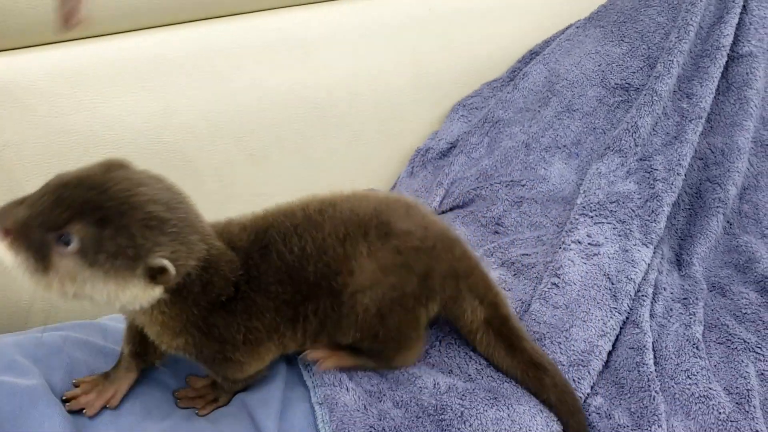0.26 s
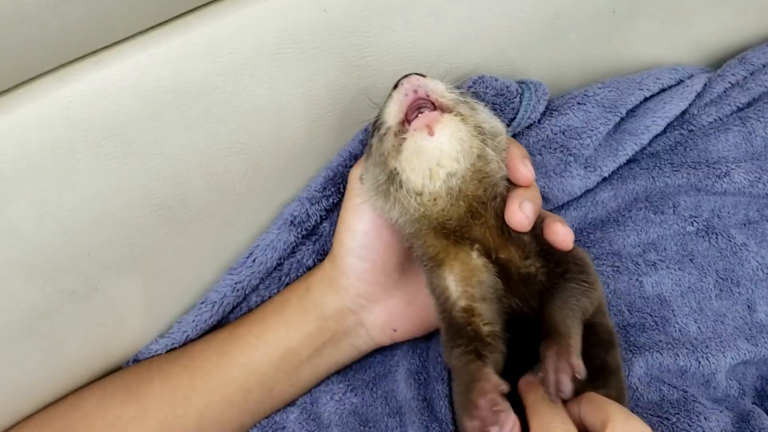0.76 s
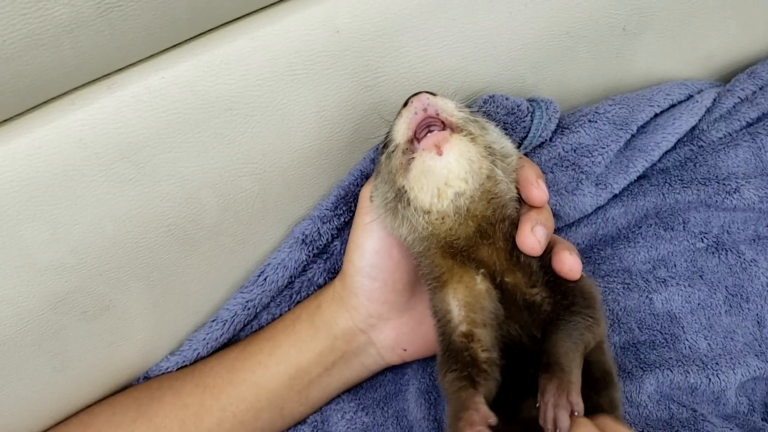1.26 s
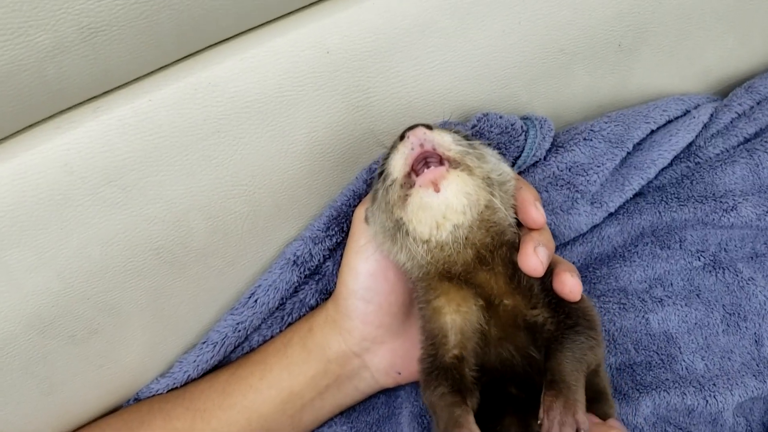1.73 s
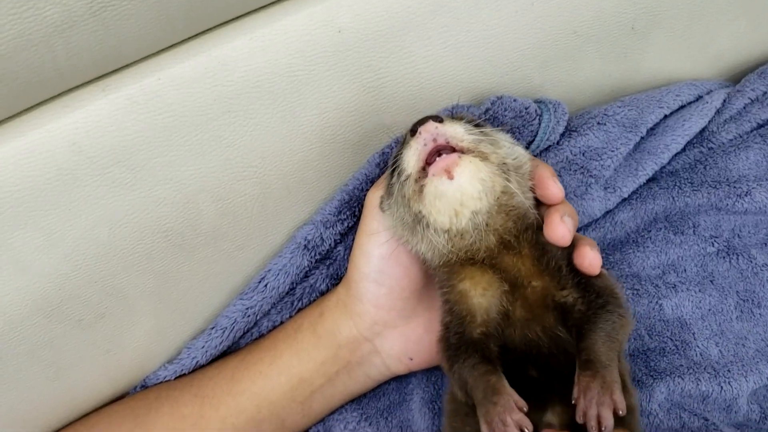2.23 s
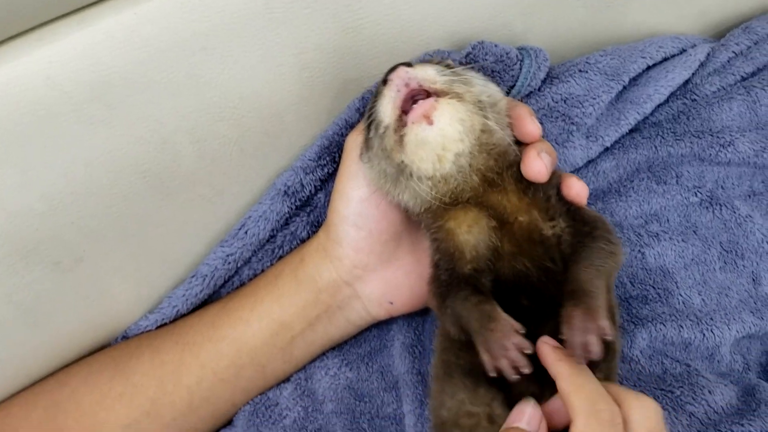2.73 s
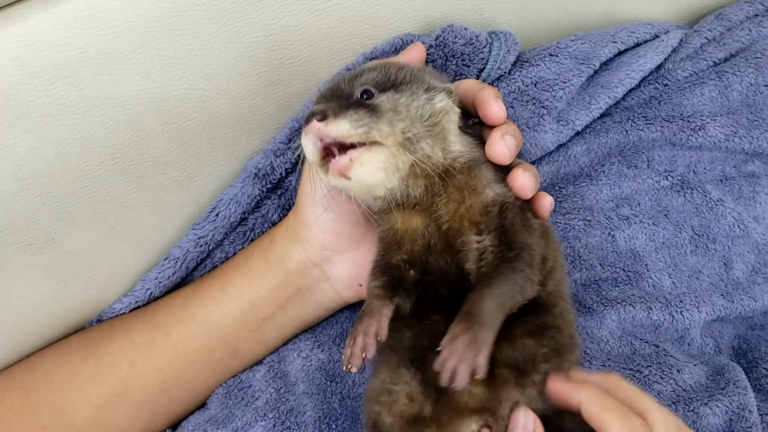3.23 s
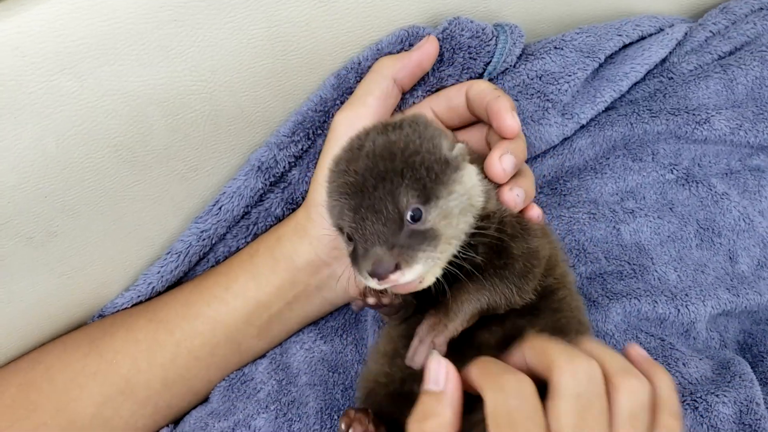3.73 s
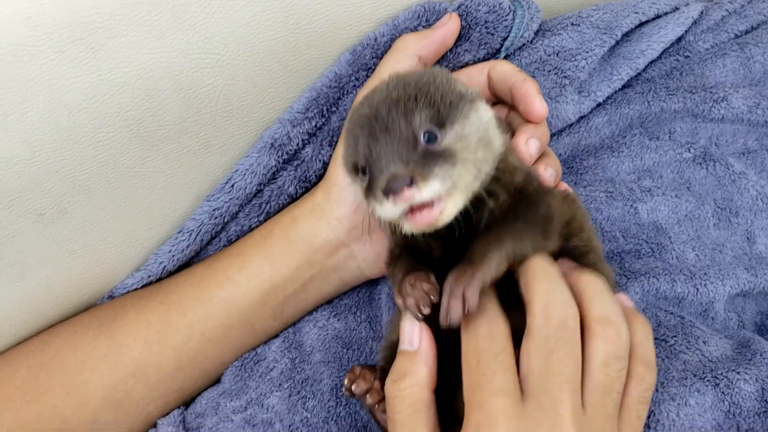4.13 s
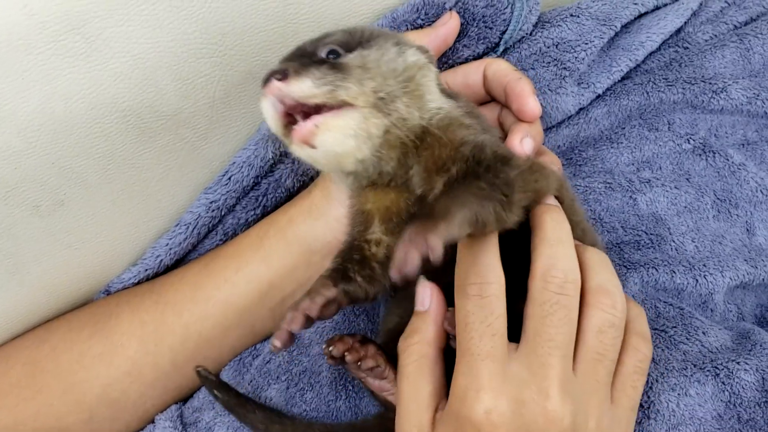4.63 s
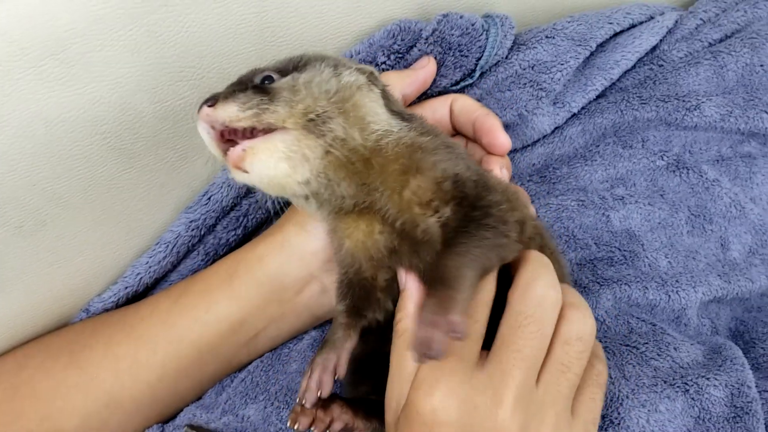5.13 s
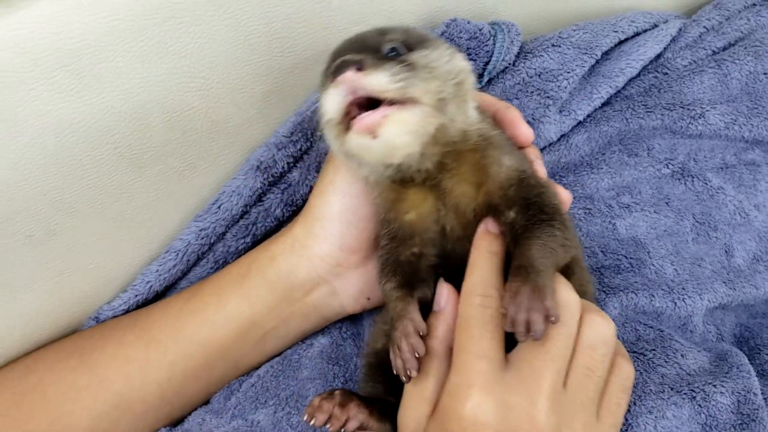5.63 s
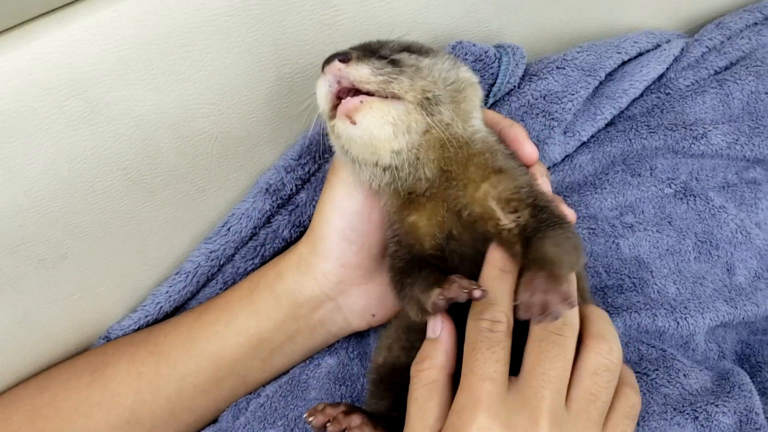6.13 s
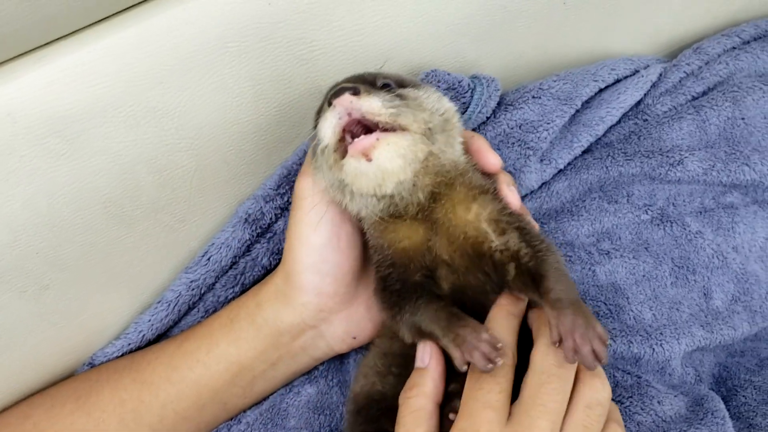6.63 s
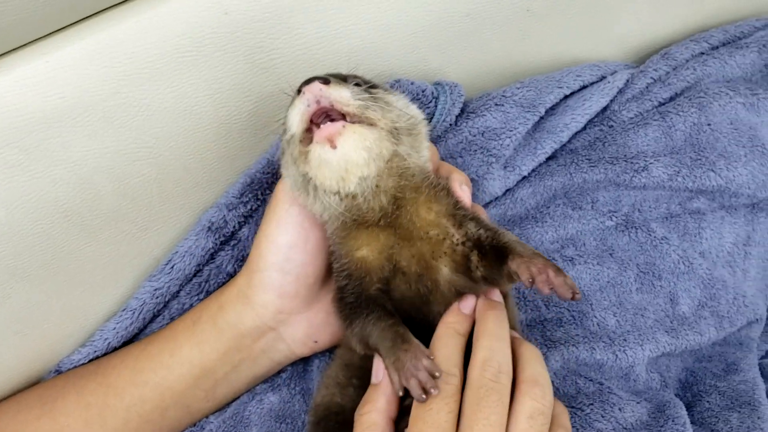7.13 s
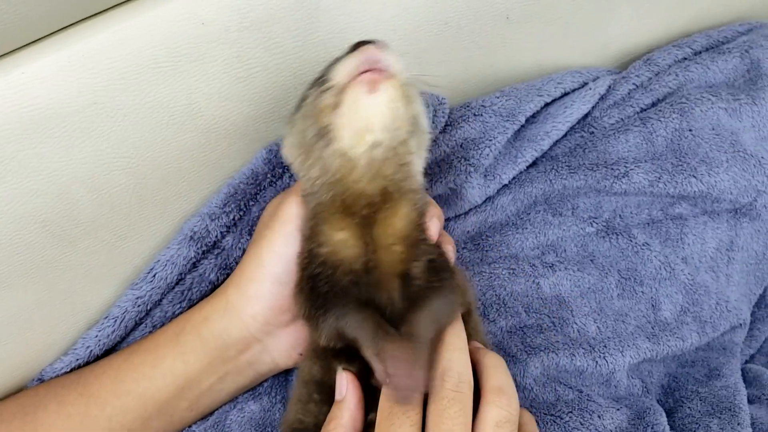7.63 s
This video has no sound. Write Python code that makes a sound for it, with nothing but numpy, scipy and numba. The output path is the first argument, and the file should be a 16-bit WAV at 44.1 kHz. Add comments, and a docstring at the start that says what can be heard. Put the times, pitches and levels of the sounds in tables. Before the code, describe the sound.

An otter pup, held close to paired microphones in a hard-walled room, cries over and over. After half a second of quiet air, a dull nudge and a tiny dropout, the squeals start abruptly, bright and grating. The middle ones are longer and a little more muffled, the later ones louder and sharper, with cracks into clear whistly pitch. A last very short chirp ends it, with small room reflections trailing in the gaps.

```python
"""First comes quiet room tone with a soft bump, then a short silence; then an otter pup squeals thirteen times.
It is held on a towel in a hard-walled room, close to a pair of microphones. Its vocal folds snap shut about
850 times a second: mostly every other snap is weak and the rest uneven, which rasps; at times they lock into
a clear tone. Clicks stand for the snaps and ring in chest, mouth and teeth; echoes and coloured noise
make the towel, the walls and the room."""
import sys
import numpy as np
from scipy import signal
from scipy.fft import rfft, irfft, next_fast_len
from scipy.io import wavfile
from scipy.ndimage import uniform_filter1d, map_coordinates
from numba import njit

SR = 44100
rng = np.random.default_rng(int(sys.argv[2]) if len(sys.argv) > 2 else 0)


def store_pcm(level_fs):
    """Save levels as 16-bit WAV."""
    pcm = np.round(np.clip(level_fs, -1, 1) * 32767).astype(np.int16)
    wavfile.write(sys.argv[1], SR, np.atleast_2d(pcm).T)


N = 346626


def from_db(db):
    """Turn decibels into a plain multiplier."""
    return 10 ** (np.asarray(db) / 20)


def in_time(rows):
    """Join points with straight lines: the first column is the time in s, each other one becomes a curve."""
    s, *columns = np.transpose(rows)
    return [np.interp(np.arange(N) / SR, s, column) for column in columns]


def during(start, end, fade):
    """Full on between two times, off elsewhere, with short ramps."""
    t = np.arange(N) / SR
    return np.clip(np.minimum(t - start, end - t) / fade + .5, 0, 1)


def at_hz(points, hz):
    """Read a curve over pitch, with pitch on a logarithmic scale."""
    return np.interp(np.log(hz + 1), np.log(np.array(points)[:, 0]), np.array(points)[:, 1])


def drift(rate):
    """Slow chance of an even spread: noise smoothed twice; a higher rate in Hz wanders faster."""
    r = np.exp(-2 * np.pi * rate / SR)
    slow = signal.lfilter([1], [1, -2 * r, r * r], rng.standard_normal(N + SR))[SR:]
    return slow / slow.std()


def clicks(at, sizes):
    """Smooth-edged clicks that may fall between samples."""
    taps = np.floor(at)[:, None] + np.arange(-7, 9)
    distance = taps - at[:, None]
    shape = np.sinc(distance) * np.cos(np.pi * distance / 16) ** 2
    places = np.clip(taps, 0, N - 1).astype(int)
    return np.bincount(places.ravel(), (shape * sizes[:, None]).ravel(), N)


@njit
def swept(x, r, twice_cos):
    """A ringing filter: each sample feeds on the two before it, so a narrow band of pitch builds up."""
    out = np.zeros(len(x))
    for i in range(2, len(x)):
        out[i] = (1 - r * r) / 2 * (x[i] - x[i - 2]) + r * twice_cos[i] * out[i - 1] - r * r * out[i - 2]
    return out


def resonance(x, hz, width_hz, db):
    """A hollow that rings at one pitch, which may move; a wider one dies away faster."""
    r = np.exp(-np.pi * width_hz / SR)
    return from_db(db) * swept(x, r, 2 * np.cos(2 * np.pi * hz / SR) * np.ones(N))


def evened(x, sounding):
    """Bring the sounding parts to one steady level over a few hundredths of a second."""
    power, share = np.abs(uniform_filter1d([x ** 2, sounding ** 2], size=1764))
    return x / np.sqrt(power / (share + 1e-6) + 1e-12)


# One row per squeal, columns counted from 0:
# 0 start_s, 1 climax_s, 2 end_s, 3 attack_s, 4 soft_db (change at the start; only a softening counts),
# 5-7 mouth_db after the attack, at the climax, at the end; 8-10 treble_db against the mouth at the same three,
# 11 chest_db against the mouth at the start (levels before the microphones add their own balance),
# 12-17 first_hz, second_hz, third_hz: mouth resonances, each at start and end,
# 18 tongue_db, 19 palate_db, 20 low_dip and 21 high_dip (depth, none to full), 22 palate_hz,
# 23-24 snaps_hz at start and end (before wavering), 25-26 roughness at start and end (none to full),
# 27 fourth (extra weakening of every fourth snap, as a share of the weakening of every other one)
SQUEAL_ROWS = [ (0.52, 0.574, 0.9, 0.0037, 1, -27, -28, -29.5, 7, 7, 6, -26.5, 3600, 3450, 8800, 8900, 12470, 12260, -15, -6, 0.1, 1, 5450, 870, 870, 1, 1, 0),
               (1.083, 1.28, 1.355, .003, -1, -31.5, -29, -31, 1.5, 7, 3, -27, 3500, 3660, 8800, 8830, 12400, 12400, -15.5, -5.5, .03, .01, 5550, 875, 875, 1, 1, 0),
               (1.573, 1.8, 2.176, 0.031, -10.5, -31, -34, -31, 4.5, 3, 6, -26, 3550, 3400, 8600, 8850, 12600, 11760, -15.5, -4.5, 0.29, 0.13, 5440, 900, 870, .9, .95, .3),
               (2.399, 2.855, 3.071, .006, 0, -35, -33.5, -34.5, 3, 3.5, 3, -21.5, 3470, 3060, 8600, 8470, 10900, 11600, -15, -8, .01, .01, 5320, 915, 805, .9, .55, .45),
               (3.219, 3.382, 3.631, 0.056, -4.5, -31, -34.5, -34, 2.5, 8, 0.5, -20.5, 3460, 3300, 8800, 9300, 11100, 12600, -14, -8.5, .01, 0.94, 5520, 860, 760, .65, .65, .4),
               (3.749, 3.86, 3.96, 0.059, -7.5, -33.5, -33.5, -34, 2, -1, 2, -18, 3120, 3220, 9500, 9400, 11800, 11700, -15.5, -4, .01, .8, 5050, 800, 800, .7, .7, .3),
               (4.109, 4.316, 4.433, .003, 7, -33.5, -35, -33, 2.5, 8, 4.5, -16.5, 3050, 3160, 9000, 8740, 13500, 11760, -11.5, -7, .01, .7, 5700, 790, 810, .7, .5, .4),
               (4.6, 4.776, 4.858, 0.051, -8.5, -29.5, -27.5, -33.5, -2, -2, -2, -26, 3449, 3400, 9900, 9400, 11400, 11350, -11.5, -8.5, 0.41, 0.42, 5250, 870, 890, 1, .85, .2),
               (5.011, 5.364, 5.465, 0.041, -8, -28, -27, -26.5, -2, 5, -2.5, -27, 3468, 3310, 8740, 9480, 11800, 11550, -12, -11.5, 1, 0.084, 5030, 870, 860, .9, .85, .4),
               (5.642, 5.978, 6.138, 0.037, -3.5, -29.5, -26.5, -30.5, 0.5, 6, -1, -24.5, 3550, 3460, 8800, 8850, 12000, 10700, -11.5, -16.5, 0.52, 0.8, 5960, 850, 860, .8, 1, .2),
               (6.317, 6.408, 6.782, 0.026, -16, -24.5, -25, -28.5, 1.5, 7, 2, -27.5, 3716, 3508, 8420, 8300, 12190, 11100, -14.5, -3, 0.096, 0.21, 5586, 870, 890, 1, 1, 0),
               (6.962, 7.123, 7.304, 0.017, -5.5, -22.5, -24.5, -25.5, 5, 3.5, 0.1, -30, 3450, 3780, 9099, 9040, 10800, 11300, -14.5, -8, .03, 0.65, 5307, 880, 870, 1, 1, 0),
               (7.78, 7.837, 7.884, 0.018, -11, -28, -30, -26, -5, -3, -1, -27.5, 2960, 2997, 9940, 10200, 11760, 11100, -7.5, -9.5, .01, 0.11, 5280, 870, 870, 1, 1, 0),
               ]


def through_squeals(first, last):
    """A control that glides from one column of the table to another during each squeal."""
    return in_time([point for row in SQUEAL_ROWS for point in ((row[0], row[first]), (row[2], row[last]))])[0]


# Stretches of clear tone, columns: start_s, end_s, first_hz and settled_hz (snap rate), settling_s,
# upturn_hz (bend added at the end), weakening of every other snap, rough_start and rough_end (none to full)
CLEAR_STRETCHES = [(0.552, 0.625, 840, 875, .03, 25, .25, .25, .28),
                   (0.79, 0.82, 865, 900, .02, 0, .25, .28, .3),
                   (1.255, 1.356, 875, 846, .015, 55, .3, .17, .24),
                   (3.25, 3.33, 875, 845, .05, 0, .9, .3, .35),
                   (3.75, 3.98, 293, 365, .13, -12, 0, .05, .05),
                   (5.69, 5.76, 850, 850, .05, 0, .9, .4, .4),
                   (5.945, 6.035, 820, 795, .015, 0, .15, .4, .25),
                   (6.316, 6.342, 1380, 1400, .02, 0, 0, .05, .1),
                   (6.378, 6.575, 940, 803, .022, 55, .2, .1, .45),
                   (6.958, 6.974, 1600, 1300, .02, 0, 0, .05, .05),
                   (6.974, 7.038, 1080, 842, .015, 0, 0, .04, .12),
                   (7.08, 7.15, 875, 810, .06, 0, .2, .45, .4),
                   (7.778, 7.824, 1500, 888, .009, 10, 0, .02, .07)]
UPTURN_S = .02  # how quickly the closing bend builds


def folds():
    """One click for each closing of the folds: an even train for the lows, a wilder, breathier one for the treble."""
    rate, rough, fourth = through_squeals(23, 24), through_squeals(25, 26), through_squeals(27, 27)
    weak, t = np.full(N, .9), np.arange(N) / SR
    for start, end, first_hz, settled_hz, settling, upturn_hz, weakening, rough_start, rough_end in CLEAR_STRETCHES:
        inside = (t >= start) & (t < end)
        s = t[inside]
        glide = (first_hz - settled_hz) * np.exp((start - s) / settling)
        upturn = upturn_hz * np.exp((s - end) / UPTURN_S)
        rate[inside] = settled_hz + glide + upturn
        weak[inside] = weakening
        rough[inside] = np.interp(s, (start, end), (rough_start, rough_end))

    # a rough voice wavers in pitch; whole cycles give the snap times, in samples
    waver = .04 * rough * drift(25) + .08 * rough * drift(250)
    cycles = np.cumsum(rate * (1 + rough * waver)) / SR
    count = np.arange(1, int(cycles[-1]))
    at = np.interp(count, cycles, np.arange(N))
    i = at.astype(int)
    luck = rng.uniform(-1, 1, (8000, 4))[:len(at)]
    at = at + 0.1492 * rough[i] * luck[:, 0] * SR / np.maximum(rate[i], 800)

    # now and then strong and weak snaps swap places
    beat = count + np.cumsum(np.abs(luck[:, 2]) < .06 * rough[i] ** 3)
    halved = np.minimum(weak[i], 1)
    sizes = from_db(5.0 * np.sqrt(rough[i]) * luck[:, 1])
    sizes = sizes * (1 - halved * (beat % 2)) * (1 - halved * fourth[i] * (beat % 4 == 0))
    snaps = clicks(at, sizes)
    wildness_db = (0.6 + rough[i]) * (2.5 * luck[:, 3] + 1.36 * drift(26)[i])
    sharp = clicks(at, sizes * from_db(wildness_db))

    def breath(x):
        """Rushing air: noise that puffs up with each snap, more so when rough."""
        puffs = signal.lfilter([1], [1, -.94], np.abs(x))
        return (.09 + rough) * puffs * rng.standard_normal(N)

    puff = breath(snaps)
    for_chest = snaps + from_db(-18) * puff
    for_mouth = snaps + from_db(-29.5) * puff
    for_treble = sharp + from_db(-12.5) * breath(sharp)
    return for_chest, for_mouth, for_treble, weak


ONSET_TREBLE_DB, ONSET_CHEST_DB = 1.5, -0.4  # change against the mouth for each dB of soft_db
CHEST_RISE_DB = 6  # the chest grows through each squeal
CLIMAX_LIFT_HZ = 78.6  # the mouth opens at the climax


def effort_rows(start, climax, end, attack, soft_db, held_db, climax_db, end_db,
                treble_held_db, treble_climax_db, treble_end_db, chest_db):
    """Attack, way to the climax, way to the end: (s, mouth dB, treble dB, chest dB, first resonance lift Hz)."""
    soft_db = min(soft_db, 0)
    soft_treble_db = treble_held_db + ONSET_TREBLE_DB * soft_db

    def chest(s):
        """The chest gains on the mouth steadily."""
        return chest_db + CHEST_RISE_DB * (s - start) / (end - start)

    return [(start, held_db + soft_db, soft_treble_db, chest_db + ONSET_CHEST_DB * soft_db, 0),
            (start + attack, held_db, treble_held_db, chest(start + attack), 0),
            (climax, climax_db, treble_climax_db, chest(climax), CLIMAX_LIFT_HZ),
            (end, end_db, treble_end_db, chest(end), 0)]


# The voice catches for an instant, columns: middle_s, length_s, depth_db
VOICE_CATCHES = [(.629, .012, -14), (.74, .01, -8), (.777, .01, -8), (4.637, .009, -6), (4.71, .018, -11),
                 (4.733, .008, -7), (4.76, .018, -10), (4.795, .026, -12), (5.018, .006, -14),
                 (5.029, .006, -12), (5.04, .006, -10), (6.095, .05, -5), (6.455, .008, -5),
                 (6.51, .01, -5), (6.575, .01, -8), (7.036, .03, -5), (7.066, .014, -7), (7.252, .012, -6)]
# Lone snaps as the folds stop, columns: time_s, strength_db
LONE_SNAPS = [(0.922, 0.5), (3.647, -10), (3.983, 1), (4.444, 2)]
# Chest resonances, columns: pitch_hz, width_hz, level_db (before the darkening of a halved voice)
CHEST_MODES = [(283, 220, -7), (685, 126, 1), (1020, 960, -2)]
TEETH = (14400, 1960, -8)  # resonance at the teeth: pitch_hz, width_hz, level_db
THROAT = (410, 80, -10)  # narrow ring that carries the halved voice: pitch_hz, width_hz, level_db
TONGUE_HZ, HOLLOW_HZ = 1910, 7070


def pup():
    """The snaps ring in chest, mouth and teeth; the three come back apart, as the head beams the treble."""
    points = [point for row in SQUEAL_ROWS for point in effort_rows(*row[:12])]
    level_db, treble_db, chest_db, lift_hz = in_time(points)
    first_hz = through_squeals(12, 13) + lift_hz
    second_hz, third_hz = through_squeals(14, 15), through_squeals(16, 17)
    tongue_db, palate_db, low_dip, high_dip, palate_hz = (through_squeals(k, k) for k in (18, 19, 20, 21, 22))
    sounding = sum(during(row[0], row[2], 0.0019) for row in SQUEAL_ROWS)
    snaps, source, sharp, weak = folds()
    snaps, source, sharp = snaps * sounding, source * sounding, sharp * sounding

    mouth = resonance(source, first_hz, 554, 0)
    mouth += resonance(source, first_hz + 500, 2850, -8.5)
    mouth -= resonance(source, palate_hz, 1350, palate_db)
    mouth = signal.sosfilt(signal.butter(2, 2500, "high", fs=SR, output="sos"), mouth)
    mouth += resonance(source, TONGUE_HZ, 374, tongue_db)
    mouth = mouth - np.clip(low_dip, 0, 1) * resonance(mouth, 2680, 330, 0)

    treble = resonance(sharp, third_hz, 1000, 0)
    treble -= resonance(sharp, second_hz, 1020, -0.63)
    treble -= resonance(sharp, *TEETH)
    treble = signal.sosfilt(signal.butter(2, 7000, "high", fs=SR, output="sos"), treble)
    treble = treble - np.clip(high_dip, 0, 1) * resonance(treble, 9650, 1600, 0)

    chest = resonance(snaps, *THROAT)
    for k, mode in enumerate(CHEST_MODES):
        darker = from_db(-5.0 * k * weak)  # the halved voice is darker
        chest += resonance(snaps, *mode) * (-1) ** k * darker
    chest = signal.sosfilt(signal.butter(2, 210, "high", fs=SR, output="sos"), chest)

    for s, length, db in VOICE_CATCHES:
        level_db = level_db + min(db, 0) * during(s - length / 2, s + length / 2, .003)
    effort = from_db(level_db)
    lone = clicks(np.array(LONE_SNAPS)[:, 0] * SR, from_db(np.array(LONE_SNAPS)[:, 1]))
    chest = effort * from_db(chest_db) * evened(chest, sounding)
    mouth = effort * evened(mouth, sounding) + resonance(lone, first_hz, 700, 0)
    treble = effort * from_db(treble_db) * evened(treble, sounding)

    def hollow(x):
        """A side pocket of the throat swallows one band."""
        return x - 0.8 * resonance(x, HOLLOW_HZ, 840, 0)

    return chest, hollow(mouth), hollow(treble)


# Turn of the head, columns: time_s, turn (higher is further left; scaled to dB for mouth and treble below),
# lead (samples by which the left port hears first)
HEAD_TURNS = [(0.5, 1, 3.5), (1.3, -3, 2.54), (2.7, 0.5, 2.58), (3.2, 6.5, 4.2), (3.88, 2.5, 2.94),
              (4.35, 1.5, 2.5), (4.75, 11, 6.18), (5.3, 7.5, 6.82), (5.65, 1, 4.1), (5.99, 8.5, 3.37),
              (6.6, 3.5, 3.6), (7.2, 4, 5.58), (7.86, 1, 5.44)]
TOWEL_DB, TOWEL_S = -11, .009  # near echoes: loudest level, spread of arrivals


def microphones(chest, mouth, treble):
    """Two ports a little apart: level and arrival follow the head; near echoes differ by side and shift with squirming."""
    turn, lead = in_time(HEAD_TURNS)
    out = np.zeros((2, N))
    for side, sign in enumerate((1, -1)):  # left, then right
        direct = chest * from_db(0.46 * sign)
        direct += mouth * from_db(sign * (0.04 * turn - 1.1) + 2.5)
        direct += treble * from_db(sign * (0.94 * turn - 5.0) - 2.5)
        out[side] = map_coordinates(direct, [np.arange(N) + sign * lead / 2], order=3, mode="nearest")
        for share in (np.arange(10) + rng.random(10)) / 10:
            lag = 20 + round(share * TOWEL_S * SR)
            turns = rng.uniform(.3, 1.2) * np.arange(N - lag) / SR + rng.random()
            squirm = np.cos(2 * np.pi * turns)  # each echo swells, fades and flips
            out[side, lag:] += from_db(TOWEL_DB - 0.9 * share) * squirm * (mouth + treble)[:-lag]
    out[0] -= resonance(out[0], 16000, 2900, -1)  # the left port is shaded from the highest treble
    return out


# How long the walls take to let a sound die away (by sixty dB), columns: pitch_hz, time_s
WALL_DECAY = [(300, 0.47), (2000, 0.62), (5500, 0.56), (14600, 0.3)]
WALLS_DB = -21


def walls(x):
    """Twelve feedback delays a side, each losing sound on every round according to its pitch."""
    size = next_fast_len(N + SR)
    hz = np.arange(size // 2 + 1) * SR / size
    spectrum = rfft(x, size)
    decay_s = at_hz(WALL_DECAY, hz)
    out = np.zeros((2, size // 2 + 1), complex)
    for k, lag in enumerate(rng.uniform(0.0073, .04, 24)):  # round trips in s
        loop = from_db(-60 * lag / decay_s) * np.exp(-2j * np.pi * hz * lag)
        out[k % 2] += loop / (1 - loop) * (-1) ** (k // 2)
    # long waves reach both ports alike
    out += (1.22 * out.mean(axis=0) - out) / (1 + (hz / 380) ** 2)
    return from_db(WALLS_DB) * irfft(out * spectrum, size)[:, :N]


# Colour of the room tone, columns: pitch_hz, level_db (per Hz; only the shape counts)
AIR_COLOUR = [(12, -51), (20, -36.5), (53, -9), (107, -10.5), (193, -12.5), (234, -15.5), (319, -19),
              (446, -15), (527, -21), (1530, -26.5), (7310, -37.5), (16000, -49)]
# Level of the room tone, before slow drift and side balance, columns: time_s, level_db
AIR_LEVEL = [(0.0, -70.5), (1.51, -76.5), (1.92, -68), (2.17, -75.5), (4.79, -65.5), (7.86, -74)]
# The microphone is nudged, columns: time_s, strength_db (of the click that sets off the thump)
NUDGES = [(0.384, -3), (1.907, -8), (6.997, -5.5)]


def room_tone():
    """Coloured noise, mostly shared by both ports, and soft low nudges."""
    colour = from_db(at_hz(AIR_COLOUR, np.arange(N // 2 + 1) * SR / N))
    mid, side = irfft(rfft(rng.standard_normal((2, N))) * colour, N)
    air = (mid + 0.47 * side * [[1], [-1]]) / mid.std()
    air = air * from_db([[-2.0], [2.0]])  # left, right
    air = air * from_db(in_time(AIR_LEVEL)[0] + 1.5 * drift(4.7))
    nudges = clicks(np.array(NUDGES)[:, 0] * SR, from_db(np.array(NUDGES)[:, 1]))
    return air + resonance(resonance(nudges, 70, 80, 0), 70, 120, 0)


def scene():
    """The pup at the microphones, its echo from the walls and the room tone."""
    chest, mouth, treble = pup()
    return microphones(chest, mouth, treble) + walls(1.9 * chest + mouth + treble) + room_tone()


SILENCE = (.403, .52)  # start_s, end_s
CUTOFF_HZ = 16800


def record(dry):
    """Peaks are rounded, a short silence is cut in and the top is cut off."""
    rounded = .95 * np.tanh(dry / .95)
    kept = rounded * (1 - during(*SILENCE, .002))
    return signal.sosfilt(signal.cheby2(16, 85, CUTOFF_HZ, fs=SR, output="sos"), kept)


dry = scene()
out = record(dry)
store_pcm(out)
```